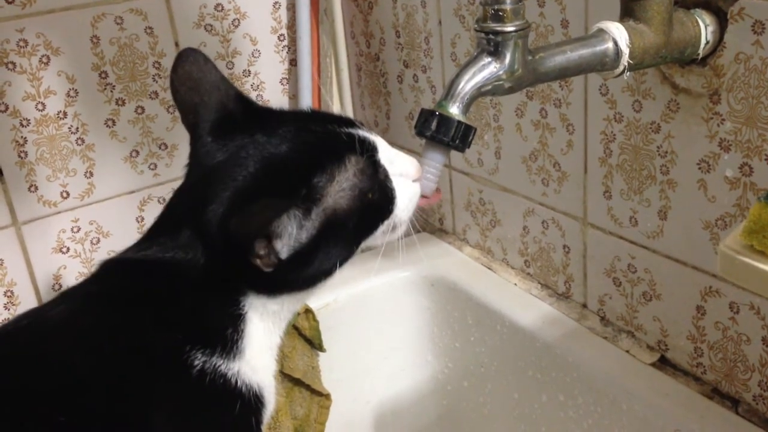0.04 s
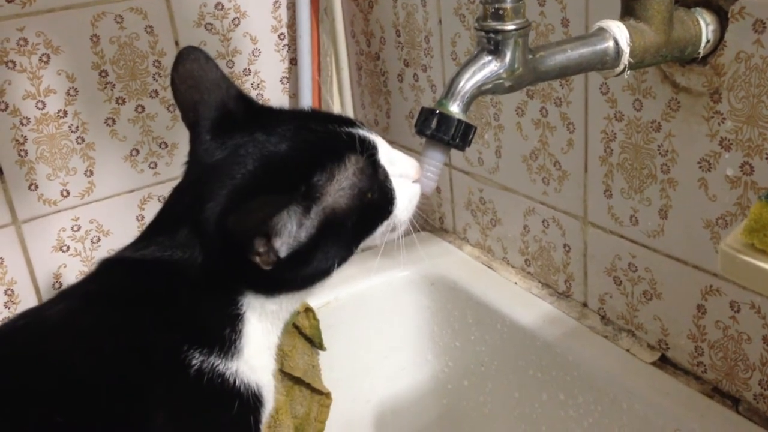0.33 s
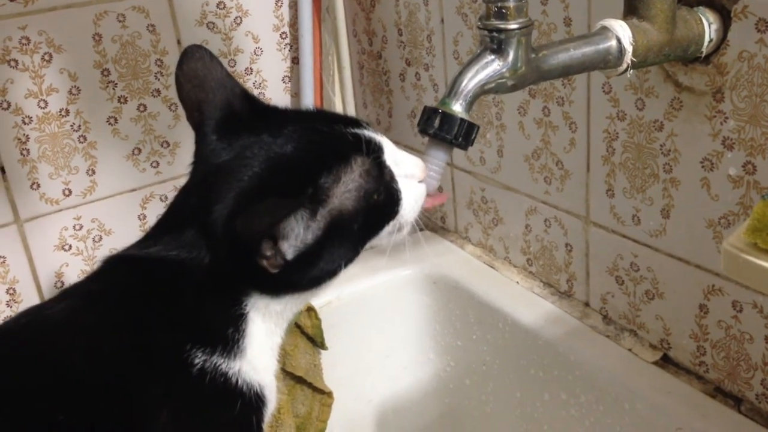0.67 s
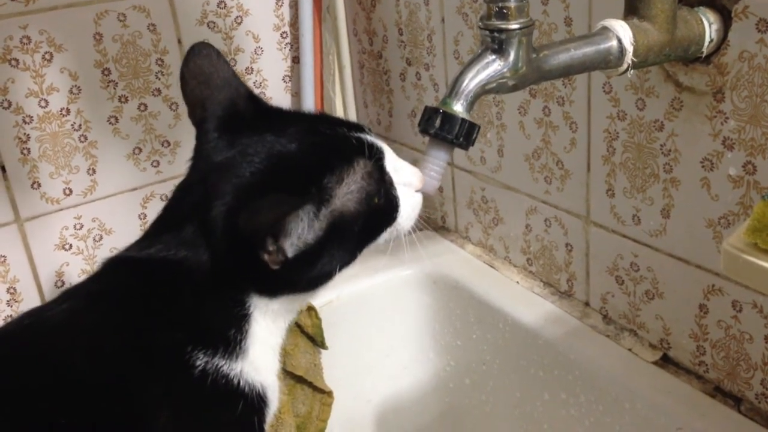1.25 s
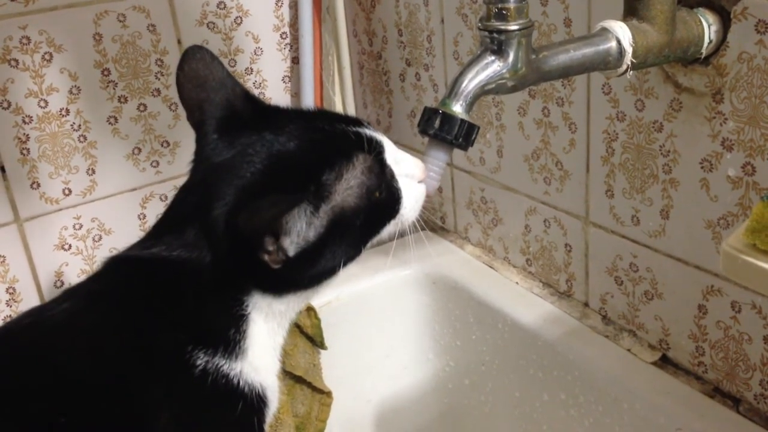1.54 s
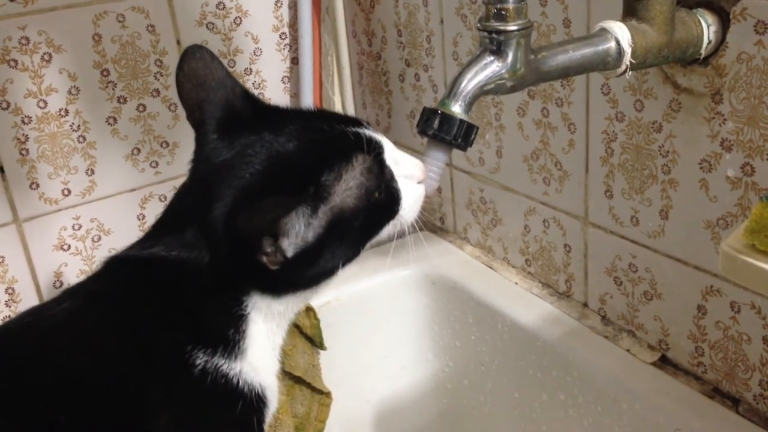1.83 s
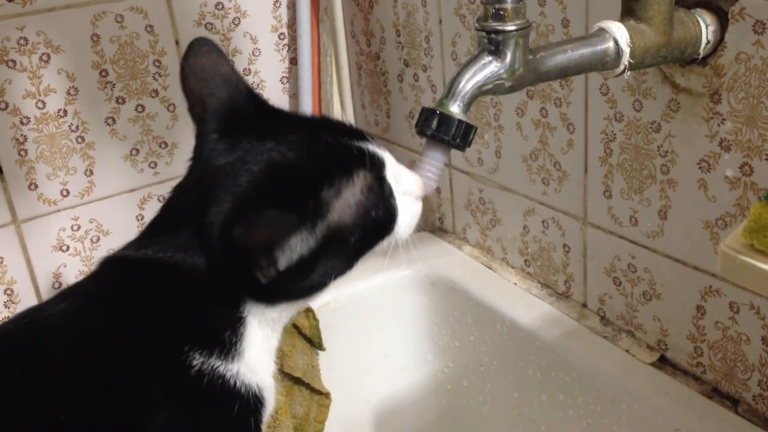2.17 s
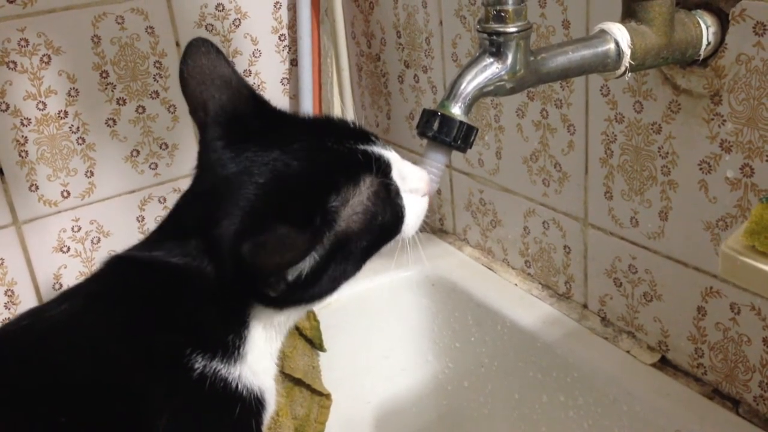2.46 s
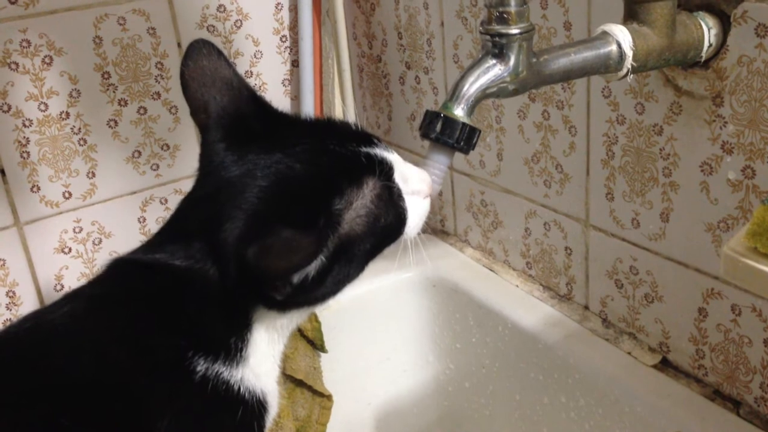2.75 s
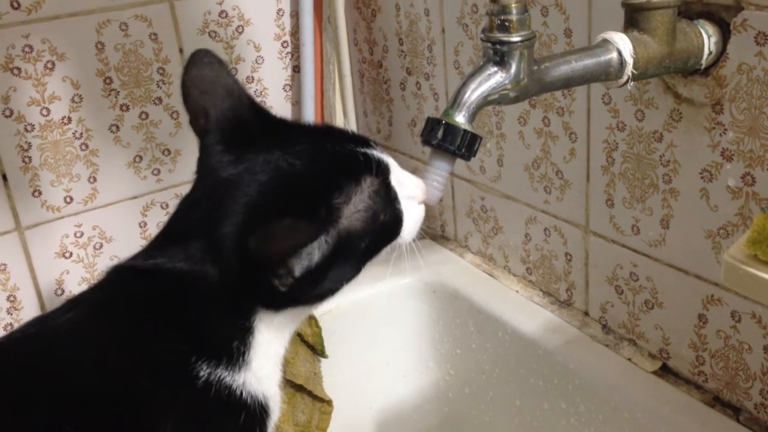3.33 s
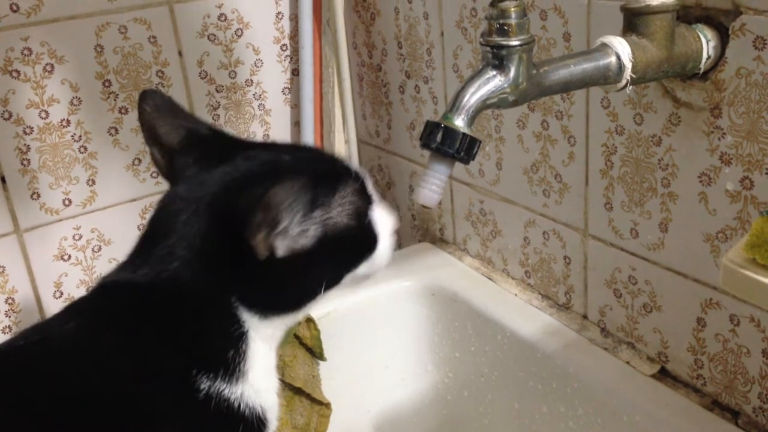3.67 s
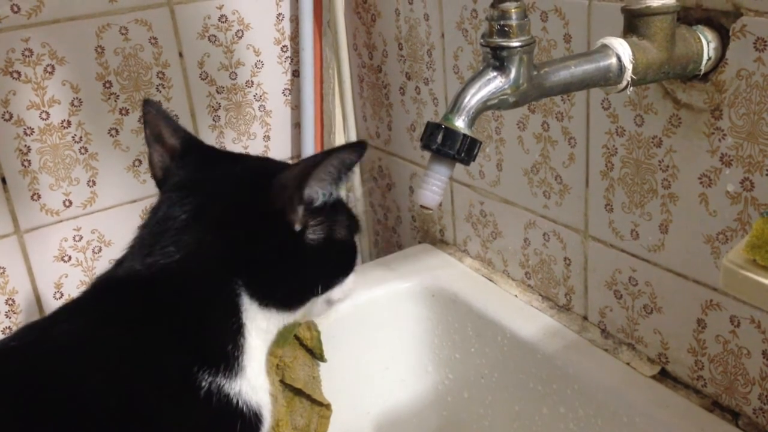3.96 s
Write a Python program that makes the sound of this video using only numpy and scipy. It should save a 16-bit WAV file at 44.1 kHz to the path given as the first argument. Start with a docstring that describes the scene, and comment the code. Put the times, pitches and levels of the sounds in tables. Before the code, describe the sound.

Faint wet ticks of a cat lapping water, light knocks and a closing loud clatter.

```python
"""A cat licks water from a tap over a basin in a small tiled room, where two low motor tones beat.
From the start its tongue snaps films of water, which give tiny ticks and a faint wet crackle.
Soft bumps and dull thunks follow, then a loose hard object knocks now and then, ringing in its modes.
After a faint wet click at 3.3 s, two heavier thunks lead into a sudden loud clatter,
which rebounds with a last sharp tick and dies away in the reverberation of the room."""
import sys
import numpy as np
from scipy import signal
from scipy.fft import rfft, irfft
from scipy.io import wavfile

SR = 44100
rng = np.random.default_rng(int(sys.argv[2]) if len(sys.argv) > 2 else 0)


def transcribe(signal):
    """Save signal, clipped to [-1, 1], as a 16-bit WAV file at the path in sys.argv[1]."""
    frames = np.atleast_2d(signal).T
    limited = np.clip(frames, -1, 1)
    pcm = np.round(limited * 32767).astype(np.int16)
    wavfile.write(sys.argv[1], SR, pcm)


N = 176400
T = np.arange(round(.7 * SR)) / SR  # time axis of one event [s]

# reverberation of the tiled room (frequency [Hz], t60 [s])
ROOM_DECAY = [(100, 0.6), (250, 0.62), (550, 0.28), (1400, 0.24), (2500, 0.21), (4000, .18), (9000, 0.18),
              (15000, 0.17)]
# tones of the motor (frequency [Hz], level [dB])
HUM_TONES = [(51, -56.5), (58.95, -64), (324, -72.5)]
# room noise and hiss (frequency [Hz], relative density [dB])
AIR_SPECTRUM = [(15, -26), (32, -13), (56, -7.5), (85, -8), (150, -3), (210, 0.5), (340, -5), (450, -10),
                (700, -20), (1500, -21), (2800, -23), (3120, -19), (3400, -22), (8000, -25.5),
                (15000, -26.5)]
AIR_DB, AIR_WAVER_DB = -61.5, 3.5

# wet crackle of the tongue (frequency [Hz], relative density [dB])
CRACKLE_SPECTRUM = [(300, -3), (700, -7.5), (1500, 1), (3000, -13.5), (6000, -16.5), (15000, -10)]
CRACKLE_PER_S, CRACKLE_DB = 28, -74
# small pitched ticks: wet ticks of the tongue, and a last sharp tick as the clatter rebounds
# (time [s], pitch [Hz], level [dB], share of clean tone [0-1])
PITCHED_TICKS = [(0.022, 5860, -59, 0.2), (0.181, 2690, -55, 0.6), (.388, 7700, -55, .5),
                 (0.504, 2760, -48.5, 0.3), (.505, 2184, -52.5, 0.5), (1.017, 3850, -57, .3),
                 (1.019, 8070, -59, .5), (1.265, 4870, -58.5, .1), (1.671, 5900, -57, 0),
                 (2.969, 4160, -53.5, 0.4), (2.971, 5400, -58, 0.6), (3.009, 1744, -43, 0.4),
                 (3.013, 1310, -44.5, 0.5), (3.381, 7630, -58, 0.5), (3.669, 2200, -35.5, 0.02)]
TICK_Q, TICK_GLIDE_PER_S = 6.3, 1.5
TICK_RISE_S, TICK_DECAY_S, TICK_ROOM_DB = 0.0037, 0.0042, -4.5

# soft bumps, and one faint bright wet click at 3.3 s
# (time [s], tap level [dB], tap tilt [dB/octave], thud level [dB])
BUMPS_AND_CLICK = [(.208, -54, 2, -48.5), (1.539, -46.5, 2, -43.5), (1.880, -54.5, 1.5, -49.5),
                   (1.918, -51.5, 0.5, -61), (2.022, -57.5, -0.5, -67), (2.121, -60, -5, -62.5),
                   (3.302, -63, 3, -79)]
# their light tap (frequency [Hz], relative density [dB])
TAP_SPECTRUM = [(150, 11), (600, 0.5), (1200, 2), (2400, -0.5), (4200, -1.5), (7000, -16.5), (15000, -25)]
# their low thud (frequency [Hz], relative density [dB])
THUD_SPECTRUM = [(60, -37), (150, 4.5), (260, 3.5), (420, -2), (900, -6), (1900, -14.5), (3000, -43)]
THUD_LAG_S = 0.007

# dull thunks (time [s], level [dB], tilt [dB/octave], build-up [s], decay time factor [ratio])
THUNK_BLOWS = [(.335, -54.5, -3, 0.034, 0.66), (1.114, -46.5, -3, 0.016, 0.83),
               (1.689, -53, -4.5, 0.0097, 0.88), (2.995, -53, -4, 0.0041, 0.37),
               (3.007, -48, 0, 0.0088, 0.62), (3.498, -24.5, 0, 0.0088, 0.64),
               (3.5349, -25.5, 0, 0.0031, 0.63)]
# dense body of a thunk (frequency [Hz], relative density [dB])
THUNK_SPECTRUM = [(60, -13), (110, -13), (200, 1.5), (380, 2), (560, 8.5), (850, 3), (1300, 4),
                  (2000, -0.5), (2600, -7.5), (4200, -12.5), (7500, -20), (15000, -30)]
# resonances of a thunk (frequency [Hz], level [dB], t60 before the decay time factor [s])
THUNK_RESONANCES = [(108.3, -12, 0.34), (481.5, -7, 0.19), (1290, -7, 0.065), (1890, -21, 0.19)]

# knocks of one loose hard object (time [s], level [dB], tilt [dB/octave])
KNOCK_BLOWS = [(0.631, -41.5, -1), (0.731, -53, -1.5), (.874, -55.5, -4), (1.301, -39, -1),
               (1.4114, -48.5, -4.5), (2.318, -54.5, -1.2), (2.470, -63.5, -3.5)]
# its dense body (frequency [Hz], relative density [dB])
KNOCK_SPECTRUM = [(100, -7), (400, -12.5), (580, -2), (800, -6), (1100, -1), (1500, -2), (2000, -1),
                  (3200, -10), (4400, -11), (5500, -19.5), (9000, -21.5), (15000, -28)]
# its resonances (frequency [Hz], level [dB], t60 [s])
KNOCK_RESONANCES = [(602.6, -15, 0.2), (841, -13.5, 0.14), (1160, -6, 0.06), (1590, -16, 0.11),
                    (2436, -3, 0.079), (2986, -4.5, 0.085), (4200, -5, 0.075)]
# its late hollow ring (frequency [Hz], level [dB], t60 [s])
BLOOM_RESONANCES = [(1820, -6.5, .11), (1837, -4, .085), (1980, -2.5, 0.083)]
BLOOM_DB, BLOOM_LAG_S = -1.5, 0.021

# crash and rebounds (time [s], level [dB], tilt [dB/octave], build-up [s], share of room t60 [ratio])
CLATTER_BLOWS = [(3.5386, -16, 1.04, 0.015, 0.69), (3.570, -32, 1, 0.0017, 0.65),
                 (3.604, -45.5, -0.5, 0.0036, 1.1), (3.640, -43.5, -3.5, .004, 0.86),
                 (3.664, -43.5, -1, 0.0089, 0.93)]
# dense body of the clatter (frequency [Hz], relative density [dB])
CLATTER_SPECTRUM = [(60, -26), (100, -7.5), (190, -7.5), (400, -14), (540, 1), (700, -2.5), (950, -5.5),
                    (1400, -3), (2000, -1.5), (2600, 1), (4400, -5.5), (5500, -16.5), (9000, -21.5),
                    (15000, -27)]
# resonances of the clatter (frequency [Hz], level [dB], t60 [s])
CLATTER_RESONANCES = [(105.5, -23, 0.46), (269.2, -22.5, 0.46), (469, -17, 0.15), (574, -11.5, 0.18),
                      (676.8, -12, 0.16), (1220, -15.5, 0.16), (1546, -6.5, 0.097), (1904, -13, 0.12),
                      (2320, -22, 0.14), (2503, -19, 0.17), (2702, -15.5, .13), (2850, -22, .16),
                      (3260, -17.5, 0.16), (4025, -14, 0.09)]

BAND_LIMIT_HZ = 15400


def amp(db):
    """Decibel law: 20 dB is a tenfold amplitude."""
    return 10 ** (np.asarray(db) / 20)


def unit(x):
    """Normalisation to rms 1."""
    return x / np.sqrt(np.mean(x ** 2) + 1e-20)


def read(points, hz):
    """Interpolation of a table on a log-frequency axis."""
    f, value = np.transpose(points)
    return np.interp(np.log(hz + 1), np.log(f + 1), value)


def add(mix, s, sound):
    """Superposition: a sound joins the mix at time s."""
    part = mix[max(round(s * SR), 0):][:len(sound)]
    part += sound[:len(part)]


def noise(spectrum, size):
    """Spectral shaping of white noise, to rms 1."""
    gain = amp(read(spectrum, np.fft.rfftfreq(size, 1 / SR)))
    return unit(irfft(rfft(rng.standard_normal(size)) * gain, size))


def tilted(x, tilt_db):
    """Spectral tilt: a blow is brightened or dulled at constant energy."""
    hz = np.fft.rfftfreq(2 * len(x), 1 / SR)
    octaves = np.log2(np.hypot(hz, 500) / 1000)  # levels off below 500 Hz
    y = irfft(rfft(x, 2 * len(x)) * amp(tilt_db * octaves))[:len(x)]
    return unit(y) * np.std(x)


def rise(seconds):
    """Linear attack envelope."""
    return np.minimum(T / seconds, 1)


def reverberant(spectrum, ring, bands=16):
    """Diffuse reverberation: each band decays exponentially, in ring times the room's t60."""
    hz, centres = np.fft.rfftfreq(len(T), 1 / SR), np.geomspace(80, 15000, bands)
    reflections, out = rfft(noise(spectrum, len(T))), 0
    for centre, share in zip(centres, np.eye(bands)):
        band = irfft(reflections * np.interp(np.log(hz + 1), np.log(centres), share), len(T))
        out = out + band * np.exp(-np.log(1000) * T / (ring * read(ROOM_DECAY, centre)))
    return out


def crack(spectrum, db, decay_s=0.0088):
    """Direct sound of an impact: a short burst of noise."""
    return amp(db) * noise(spectrum, len(T)) * np.exp(-T / decay_s)


def sine(hz, t):
    """Simple harmonic motion with a random phase."""
    return np.sin(2 * np.pi * (hz * t + rng.random()))


def modes(table):
    """Free vibration of a struck object: a sum of damped normal modes."""
    return sum(np.sqrt(2) * amp(db) * np.exp(-np.log(1000) * T / t60) * sine(hz, T)
               for hz, db, t60 in table)


def motor_hum():
    """Beating: the two low tones interfere at their difference frequency, about 8 Hz."""
    t = np.arange(N) / SR
    return sum(np.sqrt(2) * amp(db) * sine(hz, t) for hz, db in HUM_TONES)


def room_air():
    """Amplitude modulation: the lows of the room noise waver slowly under a steady hiss."""
    t = np.arange(N) / SR
    air = amp(AIR_DB) * noise(AIR_SPECTRUM, N)
    low = signal.sosfilt(signal.butter(1, 700, fs=SR, output="sos"), air)
    waver = unit(sum(sine(hz, t) for hz in np.geomspace(.5, 6, 12)))
    return air + low * (amp(AIR_WAVER_DB * waver) - 1)


def crackle():
    """A Poisson process: tiny wet clicks of the tongue come at random, blurred by the room."""
    onsets = rng.random(N) < CRACKLE_PER_S / SR
    clicks = onsets * amp(np.minimum(rng.exponential(1, N), 2))
    room = reverberant(CRACKLE_SPECTRUM, ring=0.37)
    return amp(CRACKLE_DB) * unit(signal.fftconvolve(clicks, room)[:N])


def ticks():
    """Resonance: licks give fizz and a rising bubble tone; the clatter's tick is nearly all noise."""
    out, hz = np.zeros(N), np.fft.rfftfreq(len(T), 1 / SR)
    envelope = rise(TICK_RISE_S) * np.exp(-T / TICK_DECAY_S)
    for s, pitch_hz, db, clean in PITCHED_TICKS:
        resonance = 1 / (1 + 1j * TICK_Q * (hz / pitch_hz - 1)) ** 2
        fizz = unit(irfft(rfft(rng.standard_normal(len(T))) * resonance, len(T)))
        tone = unit(np.sin(2 * np.pi * pitch_hz * T * (1 + TICK_GLIDE_PER_S * T / 2)))
        tick = np.sqrt(clean) * tone + np.sqrt(1 - clean) * fizz
        add(out, s, amp(db) * tick * envelope)
    room = reverberant([(1, 0), (SR, 0)], ring=0.61)  # starts from a flat spectrum
    return out + amp(TICK_ROOM_DB) * signal.fftconvolve(out, room / np.linalg.norm(room))[:N]


def bumps_and_click():
    """Direct and reverberant sound: a tap, then a low swelling thud; the wet click is nearly all tap."""
    out = np.zeros(N)
    for s, tap_db, tilt_db, thud_db in BUMPS_AND_CLICK:
        tap = crack(TAP_SPECTRUM, db=-2) + reverberant(TAP_SPECTRUM, ring=0.93)
        thud = reverberant(THUD_SPECTRUM, ring=0.75)
        add(out, s, amp(tap_db) * tilted(tap, tilt_db) * rise(seconds=0.0024))
        add(out, s + THUD_LAG_S, amp(thud_db) * thud * rise(seconds=0.012))
    return out


def thunks():
    """Damped resonance: hollow, padded blows with little treble and a short ring."""
    out = np.zeros(N)
    for s, db, tilt_db, build_s, ring in THUNK_BLOWS:
        damped = [(hz, mode_db, ring * t60) for hz, mode_db, t60 in THUNK_RESONANCES]
        blow = reverberant(THUNK_SPECTRUM, ring) + modes(damped)
        add(out, s, amp(db) * tilted(blow, tilt_db) * rise(build_s))
    return out


def knocks():
    """One impulse response: an object knocks in one place, harder or softer; its ring swells late."""
    out = np.zeros(N)
    knock = crack(KNOCK_SPECTRUM, db=-1.5) + reverberant(KNOCK_SPECTRUM, ring=0.92)
    knock += modes(KNOCK_RESONANCES) * rise(seconds=0.03)
    add(knock, BLOOM_LAG_S, amp(BLOOM_DB) * modes(BLOOM_RESONANCES) * rise(seconds=0.007))
    for s, db, tilt_db in KNOCK_BLOWS:
        add(out, s, amp(db) * tilted(knock, tilt_db) * rise(seconds=0.003))
    return out


def clatter():
    """Impact excitation: a bright crash and its small rebounds set modes and room ringing."""
    out = np.zeros(N)
    for s, db, tilt_db, build_s, ring in CLATTER_BLOWS:
        blow = reverberant(CLATTER_SPECTRUM, ring) + modes(CLATTER_RESONANCES)
        add(out, s, amp(db) * tilted(blow, tilt_db) * rise(build_s))
    return out


def scene():
    """Superposition of all sources at one microphone."""
    ongoing = motor_hum() + room_air() + crackle()
    return (ongoing + ticks() + bumps_and_click() + thunks() + knocks() + clatter())[None]


def record(dry):
    """Band limiting: a linear-phase low-pass removes the highest treble."""
    lowpass = signal.firwin(601, BAND_LIMIT_HZ, window=("kaiser", 9), fs=SR)
    return signal.oaconvolve(dry, lowpass[None], "same")


dry = scene()
out = record(dry)
transcribe(out)
```